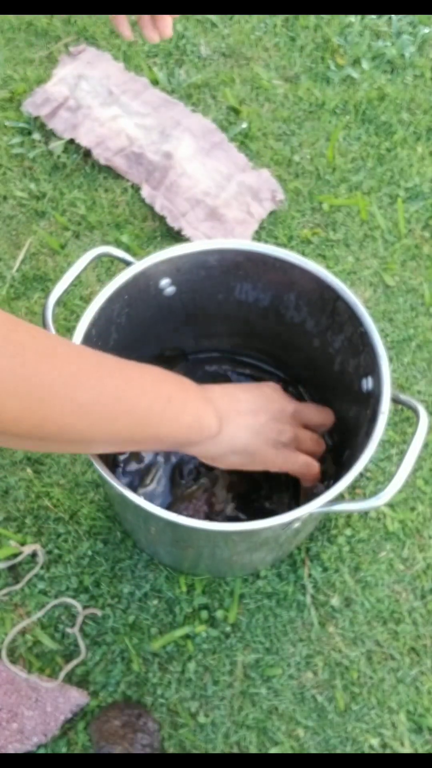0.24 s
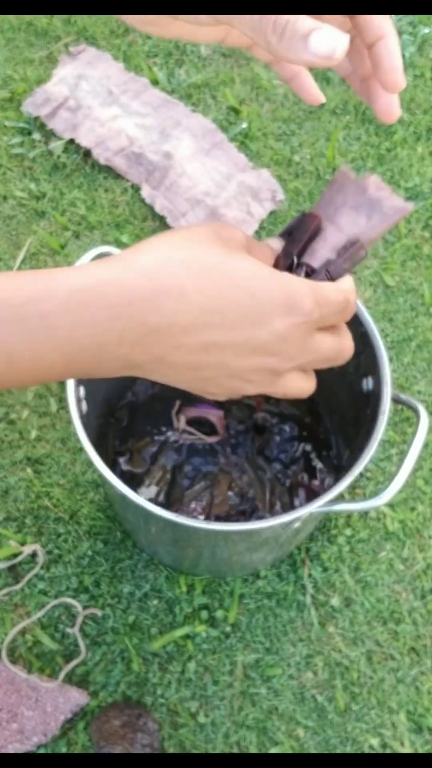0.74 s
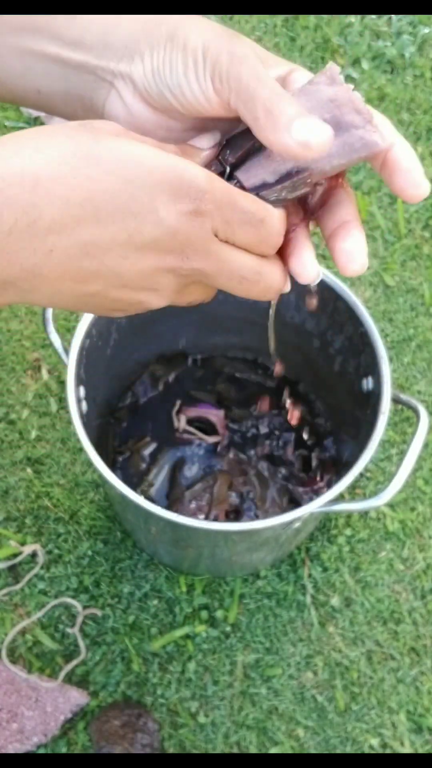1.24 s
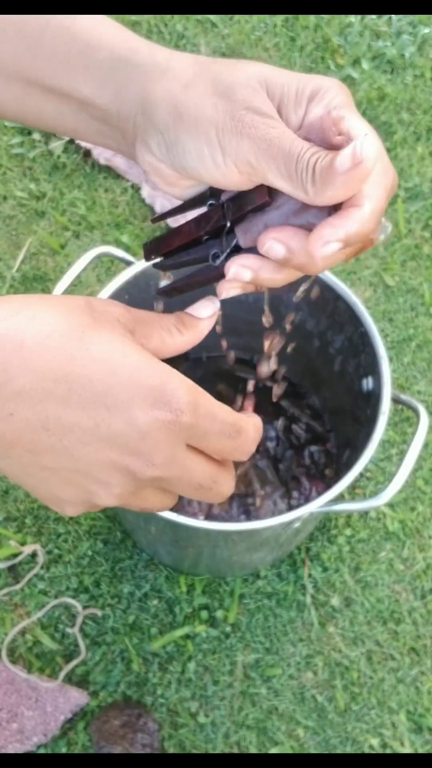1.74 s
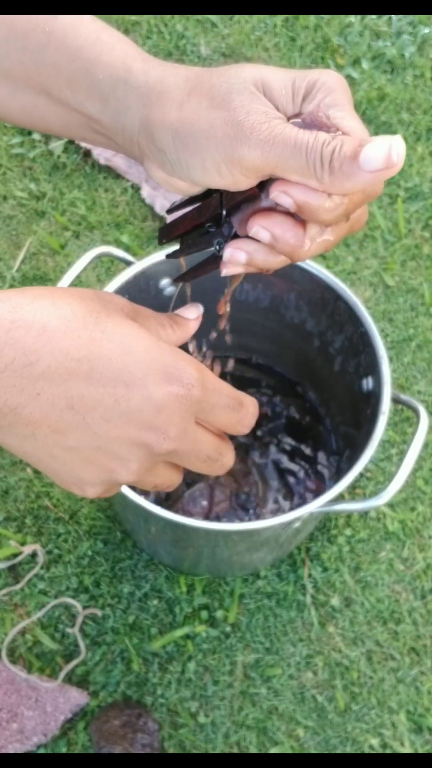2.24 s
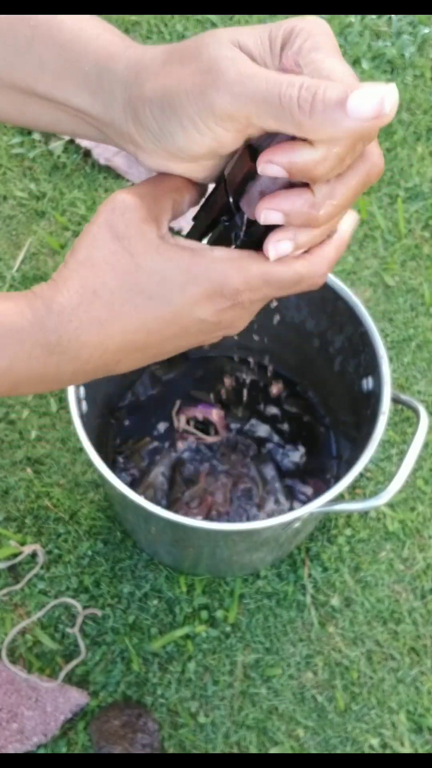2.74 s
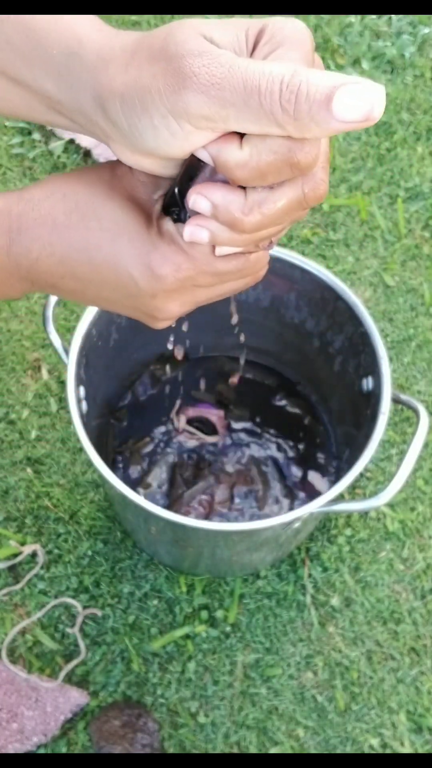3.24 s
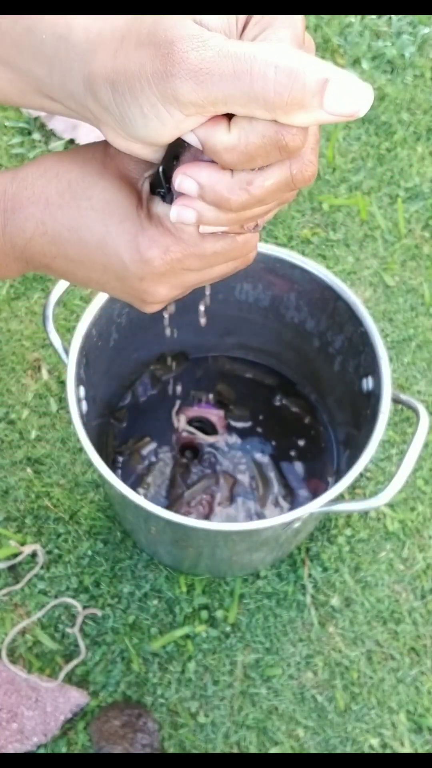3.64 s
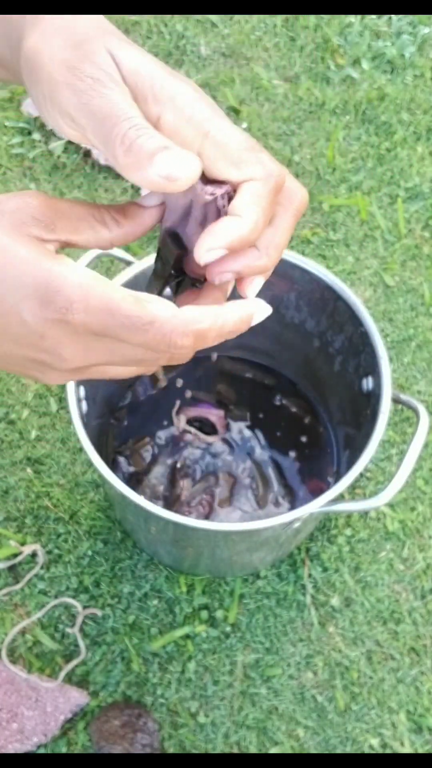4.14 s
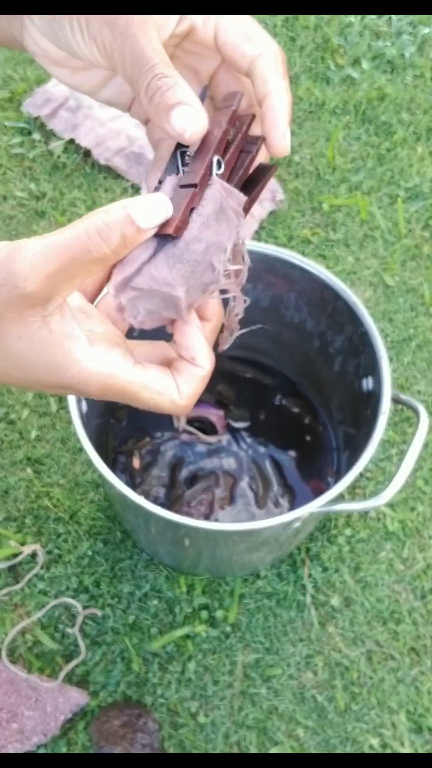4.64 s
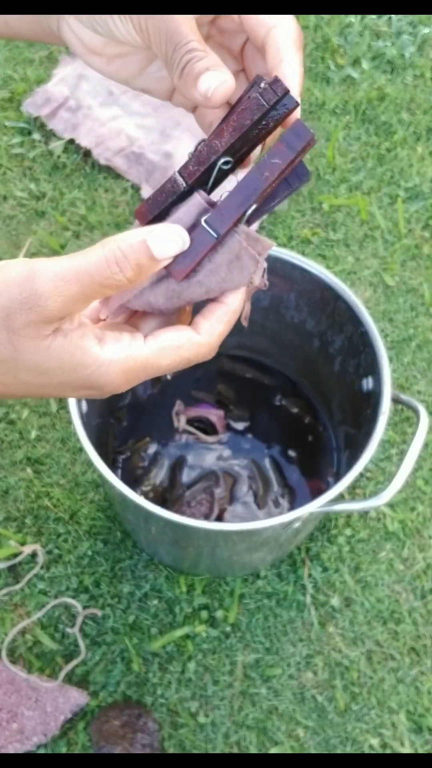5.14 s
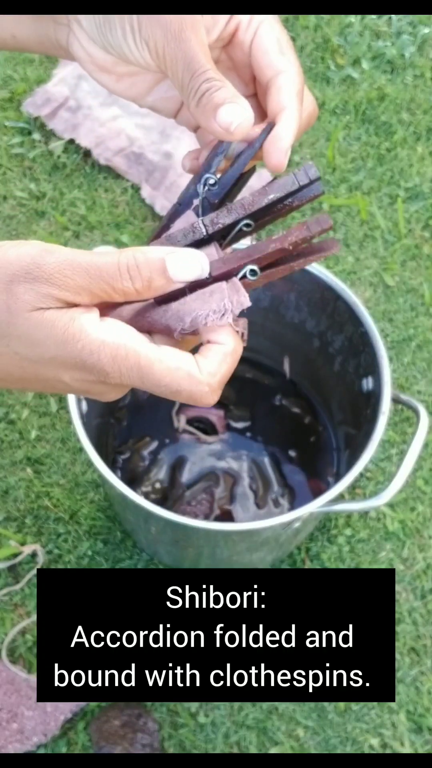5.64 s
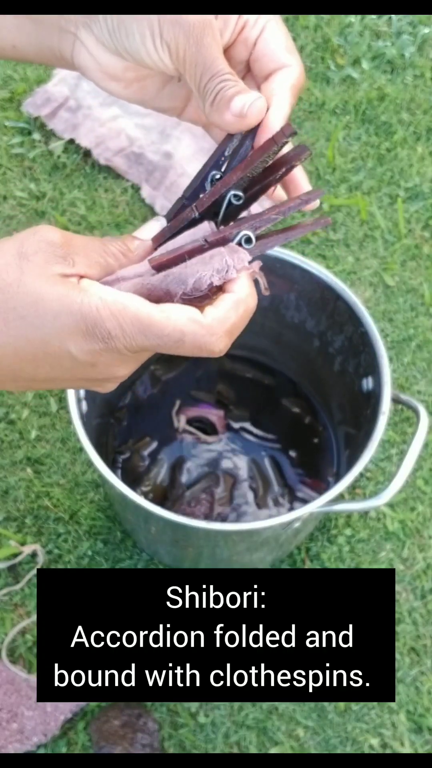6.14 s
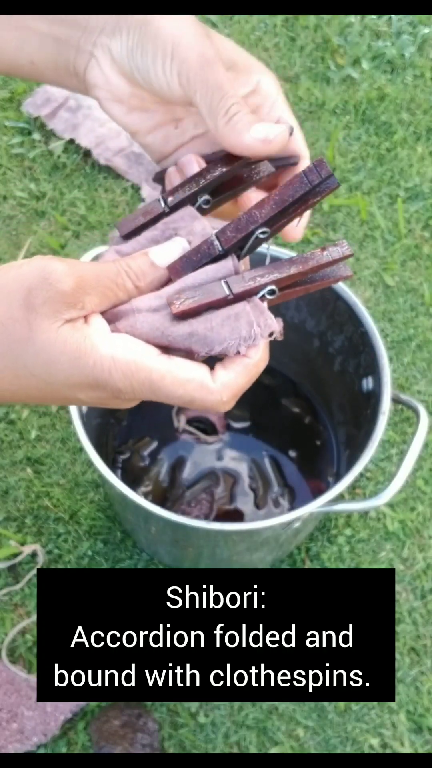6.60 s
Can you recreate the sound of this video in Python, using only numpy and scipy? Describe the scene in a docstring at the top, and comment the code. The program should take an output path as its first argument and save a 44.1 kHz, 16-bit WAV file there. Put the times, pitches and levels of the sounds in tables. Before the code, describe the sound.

A close stereo pickup outdoors beside a steel pot of liquid. From 0.1 to 0.5 s there are small plops and low bubbly blips as a hand moves in the dye. From 0.6 s the wet bundle comes out, and at 0.8 to 1.3 s bright drops slap and plink rapidly, with fine spray. After a brief thinning, from 1.5 to 2.8 s the wringing sends down the densest stream: crisp, high splashes, rising bubble chirps and quick gulps, strongest near 1.9 s, coloured by a short, slightly metallic pot echo. A lull follows, then sparse ticking drips from 3.2 to 4.2 s, isolated ones near 4.4, 4.65 and 4.9 s, and a last faint tick near 5.9 s. Throughout, low traffic rumble, a distant engine hum around 100 Hz that wavers, and a very thin high insect whine; faint husky bird whistles are clearest around 1.6, 3.4 to 3.9 and 5.9 to 6.3 s.

```python
"""Dye runs off a wrung cloth bundle into a steel pot on a lawn, close to a two-port stereo microphone.
Drops are noise slaps, bubbles are dying tones whose pitch climbs, gulps are fast upward sweeps.
Spray is a patter of blips over hiss; the drops excite resonances, and a short treble echo colours all.
Behind it: traffic rumble (shaped noise), a far engine drone (five harmonics), a thin insect whine
(narrow noise) and a distant bird (husky gliding whistles with echoes)."""
import sys
import numpy as np
from scipy import signal
from scipy.fft import rfft, irfft
from scipy.io import wavfile
from scipy.ndimage import uniform_filter1d

SR = 44100
rng = np.random.default_rng(int(sys.argv[2]) if len(sys.argv) > 2 else 0)


def unload_audio(sound):
    """Save the sound as a 16-bit wav file, at the path given as the first command line argument."""
    columns = np.transpose(np.atleast_2d(sound))
    # keep every value between -1 and 1, then stretch to whole-number steps
    steps = np.round(np.clip(columns, -1, 1) * 32767)
    wavfile.write(sys.argv[1], SR, steps.astype(np.int16))


N = 302834  # length in samples


def gain_of(db):
    """Decibels to amplitude."""
    return 10 ** (np.asarray(db) / 20)


def evened(x):
    """Scales to rms 1."""
    return x / np.sqrt(np.mean(x ** 2) + 1e-20)


def read(points, hz):
    """Reads a spectrum on a log-frequency axis."""
    f, value = np.transpose(points)
    return np.interp(np.log(hz + 1), np.log(f + 1), value)


def follow(points, seconds):
    """Reads a (time, value) table with straight lines between its points."""
    return np.interp(seconds, *np.transpose(points))


def sine(pitch_hz):
    """A sine that follows a pitch curve."""
    return np.sin(2 * np.pi * np.cumsum(pitch_hz) / SR)


def add(mix, s, sound, pan_db, lag_s=0.):
    """Places a one- or two-channel sound in the mix, the left lag_s later; pan_db mainly softens the right."""
    for side, sign, start in ((0, 0.03, s + lag_s), (1, -2, s)):
        part = mix[side, round(start * SR):][:sound.shape[-1]]
        part += np.atleast_2d(sound)[-side, :len(part)] * gain_of(sign * pan_db / 2)


def band(x, lo_hz, hi_hz):
    """Band-pass filter."""
    sos = signal.butter(2, [lo_hz, min(hi_hz, SR / 2.1)], "band", fs=SR, output="sos")
    return signal.sosfilt(sos, x)


def resonate(x, hz, width_hz):
    """Shifts the curve hz down to zero, smooths, and shifts back."""
    turn = np.exp(2j * np.pi * np.cumsum(hz * np.ones(len(x))) / SR)
    r = np.exp(-np.pi * width_hz / SR)
    return 2 * (turn * signal.lfilter([1 - r], [1, -r], x / turn)).real


def tail(t60, seconds):
    """Two unrelated dying noise tails of energy 1."""
    t = np.arange(round(seconds * SR)) / SR
    x = rng.standard_normal((2, len(t))) * gain_of(-60 * t / t60)
    return x / np.linalg.norm(x, axis=1)[:, None]


# Outdoor air, spectrum before the overall level is set: f/Hz, relative level per Hz/dB
AIR_SPECTRUM = [(25, -27.5), (50, -1), (85, 4.5), (140, 2), (230, -13.5), (400, -24), (750, -31.5),
                (1050, -29.5), (1400, -39), (2500, -43.5), (5000, -55), (8600, -61), (11500, -44.5),
                (15500, -40)]
# Likeness of the two ports once the lag is taken out: f/Hz, likeness (0 to 1)
PORT_LIKENESS = [(30, 0.93), (180, 0.83), (550, 0.41), (1400, 0.35), (4000, 0.091), (15000, 0.056)]
# Lean of the air toward the left port: f/Hz, left minus right level/dB
PORT_LEAN = [(30, 2.5), (60, -2.5), (180, 0.5), (550, 2.5), (1650, 0), (4970, 2), (15000, 6.5)]
# Swell of the traffic's bass: t/s, level/dB
RUMBLE_SWELL = [(0, -1), (.6, -1.5), (1.198, -1), (2.6, 0), (3.299, 1), (4.199, 1), (4.701, 0), (5.5, 1.5),
                (6.202, -1), (6.6, 3.5), (6.87, -0.5)]
# Swell of the tyre band around 950 Hz: t/s, level/dB
TYRE_SWELL = [(0, 1), (1.8, 1), (2.099, 6), (2.7, 2), (3.1, -2.5), (3.5, 3), (4, -2), (5.6, 2), (6.1, 1.5),
              (6.87, 1.5)]
STREET_LAG_S = 0.00041  # the left port hears the treble this much later


def background():
    """Street and air: patchy shaped noise whose bass and tyre band swell with the traffic."""
    frames, hz = N // 512 + 5, np.fft.rfftfreq(2048, 1 / SR)
    a, b, c, d, patches = rng.standard_normal((frames, 1025, 5)).T
    patches = uniform_filter1d(patches, size=20, axis=0)
    patches = evened(uniform_filter1d(patches, size=8, axis=1))
    now = np.arange(frames) * 512 / SR
    bass = 1 / (1 + (hz[:, None] / 250) ** 4)
    tyre_band = 1 / (1 + (np.log2(hz[:, None] / 950 + 0.0015) / 0.86) ** 4)
    swell_db = bass * follow(RUMBLE_SWELL, now) + tyre_band * follow(TYRE_SWELL, now)

    same = np.clip(read(PORT_LIKENESS, hz), -1, 1)[:, None]
    left, stranger = a + 1j * b, c + 1j * d
    # the bass arrives from all round, so its lag vanishes
    lag_s = STREET_LAG_S * hz ** 2 / (hz ** 2 + 900 ** 2)
    lag = np.exp(-2j * np.pi * hz * lag_s)[:, None]
    z = np.array([left * lag, same * left + np.sqrt(1 - same ** 2) * stranger])
    lean_db = read(PORT_LEAN, hz)[:, None] / 2 * np.array([1, -1])[:, None, None]
    z *= gain_of(read(AIR_SPECTRUM, hz)[:, None] + lean_db + 1.27 * patches + swell_db)
    noise = signal.istft(z, nperseg=2048, noverlap=1536)[1][:, :N]
    return gain_of(-46.5) * evened(noise)


# Far engine: t/s, firing rate f/Hz, reference level/dB, lift of the upper multiples/dB
ENGINE = [(0.0, 99.3, -55, -2.5), (0.94, 98.64, -53, 0.5), (1.74, 98.4, -48, -1.5), (2.298, 97.71, -53, 2),
          (3.8, 97.5, -50.5, -11), (4.219, 97.3, -53.5, -2), (4.499, 97.25, -73.5, 9),
          (4.8, 97.37, -55.5, 5.5), (5.451, 97.36, -50.5, 6.5), (6.1, 97.2, -59.5, 11),
          (6.45, 96.8, -50, -2), (6.87, 96.55, -56.5, 1)]
# Its harmonics: multiple of the firing rate, level against the reference/dB, share of the lift
ENGINE_MULTIPLES = [(1, -1, 0), (2, -1, 0), (3, -18, 0.8), (4, -25.5, 0.97), (5, -31.5, 1)]
WAVER_DB, WAVER_HZ = 1.5, 2.5  # rms waver of the first multiple; upper limit of its rate


def drone():
    """Far engine: steady firing heard as five harmonics that fade in and out with the air."""
    s, *controls = np.transpose(ENGINE)
    t = np.arange(N) / SR
    hz, level_db, lift_db = (np.interp(t, s, c) for c in controls)
    turns, out = np.cumsum(hz) / SR, np.zeros(N)
    for k, db, share in ENGINE_MULTIPLES:
        # each multiple wavers by itself, the higher ones more
        waver = evened(sum(np.sin(2 * np.pi * (WAVER_HZ * a * t + b)) for a, b in rng.random((5, 2))))
        level = gain_of(level_db + db + share * lift_db + WAVER_DB * np.sqrt(k) * waver)
        out += np.sqrt(2) * level * np.sin(2 * np.pi * (round(k) * turns + rng.random()))
    return out


WHINE_HZ, WHINE_WIDTH_HZ, WHINE_DB = 14900, 160, -80  # centre; width of each filter pass; level before the lean


def whine():
    """Insect: noise narrowed by two resonances, stronger at the left port."""
    hiss = []
    for x in rng.standard_normal((2, N)):
        once = resonate(x, WHINE_HZ, WHINE_WIDTH_HZ)
        hiss.append(resonate(once, WHINE_HZ, WHINE_WIDTH_HZ))
    return gain_of(WHINE_DB) * evened(np.array(hiss)) * gain_of([[3], [-3]])


# Distant bird notes: t/s, length/s, nominal level/dB, first f/Hz, last f/Hz, width of each husk filter/Hz
BIRD_NOTES = [(0.553, 0.081, -62.5, 2750, 2750, 300), (1.588, 0.22, -59, 2575, 3090, 350),
              (1.85, 0.067, -60, 2870, 2720, 200), (3.298, 0.078, -74.5, 2070, 2650, 99),
              (3.428, 0.083, -59, 2950, 2740, 407), (3.507, 0.17, -78, 2880, 2860, 200),
              (3.618, 0.094, -62, 2010, 2170, 352), (3.752, 0.028, -73, 2000, 1980, 250),
              (3.803, 0.051, -63, 2184, 1810, 150), (3.854, 0.026, -65, 1800, 1820, 250),
              (4.67, .45, -75, 1573, 1570, 497), (4.73, 0.41, -68, 2590, 2560, 804),
              (5.574, 0.21, -76, 2016, 2150, 700), (5.756, 0.18, -73.5, 1590, 1600, 182),
              (5.879, 0.078, -61, 2860, 2780, 345), (5.881, 0.15, -78, 2340, 2500, 254),
              (5.976, 0.12, -77.5, 2840, 2750, 200), (6.07, 0.073, -58.5, 2013, 2160, 300),
              (6.121, 0.052, -66.5, 2220, 2500, 251), (6.154, 0.11, -74.5, 2070, 1960, 201.5),
              (6.246, 0.12, -63, 1970, 1978, 379), (6.535, 0.13, -71, 2434, 2290, 256),
              (6.779, 0.051, -72, 2270, 2260, 200), (6.82, 0.063, -67, 1950, 1980, 407)]


def bird():
    """Distant bird: gliding whistles mixed with narrow noise, blurred by echoes off trees and walls."""
    song = np.zeros((2, N))
    for s, length, level_db, first_hz, last_hz, husk_hz in BIRD_NOTES:
        pitch = np.linspace(first_hz, last_hz, round(length * SR))
        clear = np.sqrt(2) * sine(pitch)
        husky = rng.standard_normal(SR // 2)[:len(pitch)]
        for _ in range(3):
            husky = resonate(husky, pitch, husk_hz)
        note = (0.94 * clear + 2.13 * evened(husky)) * signal.windows.tukey(len(pitch), .7)
        add(song, s, gain_of(level_db) * note, 5, .00018)
    return 0.6 * song + 0.35 * signal.oaconvolve(song, tail(0.24, 0.3), axes=1)[:, :N]


# Fine spray between the drops: t/s, reference level/dB, brightness before its drift/dB per octave
SPRAY_COURSE = [(0.0, -80.5, -5), (0.48, -77, -12.5), (0.6, -68, 1), (0.9, -83.5, -8), (1.0, -56, -9),
                (1.13, -70.5, -6), (1.26, -79.5, -6), (1.469, -73, -3), (1.66, -68, -8), (2.36, -68, 1.5),
                (2.66, -66.5, -5.5), (2.9, -79, 6.5), (3.48, -91, 7), (3.74, -89, 13), (3.79, -73, -8),
                (3.89, -68, -4), (4.27, -87.5, 6), (5.201, -92, -13), (5.531, -98.5, -7.5), (6.87, -102, 1)]
# Colour of the spray: f/Hz, relative level/dB
SPRAY_TINT = [(1800, -14.5), (2600, -16.5), (4000, -10), (5500, -6.5), (7200, 1.5), (8800, -12.5),
              (11500, -5), (15500, -1)]
# rms swings: the hiss flickers, droplets come in clumps, their brightness (dB per octave) wanders
FLICKER_DB, CLUMP_DB, DRIFT_DB = 4.5, 5, 3


def spray():
    """Droplets too small to count: short rising blips of unequal size over the hiss of wet cloth."""
    s, level_db, bright_db = np.transpose(SPRAY_COURSE)
    now, t = np.arange(N) / SR, np.arange(400) / SR
    level_db, bright_db = np.interp(now, s, level_db), np.interp(now, s, bright_db)
    slow = (uniform_filter1d(uniform_filter1d(x, size=900), size=900) for x in rng.standard_normal((2, N)))
    flicker, drift = (evened(x) for x in slow)
    bright_db = bright_db + DRIFT_DB * drift

    patter = np.zeros((2, N))
    for hz in np.geomspace(1800, 15500, num=26):
        fade = gain_of(-60 * t * hz / 49.0)  # 60 dB in 49 cycles of the starting pitch
        blip = np.sin(2 * np.pi * hz * t * (1 + 60 * t)) * fade * hz / 6000
        draw, side, big = rng.random((3, N))
        at = np.flatnonzero(draw < 65. / SR * gain_of(CLUMP_DB * flicker))
        unequal_db = 16.0 - 3.47 * np.log(big[at] + 0.0033)
        colour_db = bright_db[at] * np.log2(hz / 6000) + read(SPRAY_TINT, hz)
        size = np.zeros(N)
        size[at] = gain_of(unequal_db + level_db[at] + colour_db)
        ports = size * np.array([side, 0.72 * (1 - side)])
        patter += signal.oaconvolve(ports, blip[None], axes=1)[:, :N]

    tint = list(SPRAY_TINT) + [(17000, -8.5)]
    colour = gain_of(read(tint, np.fft.rfftfreq(N, 1 / SR)))
    hiss = evened(irfft(rfft(rng.standard_normal((2, N))) * colour, N))
    wet = np.clip((level_db + 71) / 15, 0, 1)  # flickers only while dye runs
    # the hiss swells less than the patter
    return patter + gain_of(0.63 * level_db - 23.5 + FLICKER_DB * wet * flicker) * hiss


# rate at each pitch; level above the spray before unequal sizes; cycles of the starting pitch to fall 60 dB
PLINKS_PER_S, PLINK_DB, PLINK_CYCLES = 7.5, 7.5, 18


def plinks():
    """Small bubbles in their dozens: brief rising tones, louder wherever the spray is thick."""
    s, level_db, _ = np.transpose(SPRAY_COURSE)
    level_db = np.interp(np.arange(N) / SR, s, level_db)
    out, t = np.zeros((2, N)), np.arange(1500) / SR
    for hz in np.geomspace(1700, 6500, num=14):
        envelope = gain_of(-60 * t * hz / PLINK_CYCLES) * np.minimum(t / 0.00075, 1)
        plink = np.sin(2 * np.pi * hz * t * (1 + 3 * t)) * envelope
        draw, side, big = rng.random((3, N))
        size = (draw < PLINKS_PER_S / SR) * gain_of(PLINK_DB + level_db - 2.4 * np.log(big + 0.027))
        ports = size * np.array([side, 0.81 * (1 - side)])
        out += signal.oaconvolve(ports, plink[None], axes=1)[:, :N]
    return out


# Cavities that close fast behind a heavy drop: t/s, peak level before pan/dB, first f/Hz, last f/Hz, length/s
CAVITIES = [(0.808, -47, 4300, 5640, 0.0091), (2.011, -38, 2130, 5240, .009),
            (2.187, -29, 3060, 5700, 0.01), (2.288, -48, 2950, 6300, 0.0046)]


def gulps():
    """Closing cavities: a brief tone that shoots upward as the cavity shrinks."""
    out = np.zeros((2, N))
    for s, peak_db, first_hz, last_hz, length in CAVITIES:
        pitch = np.geomspace(first_hz, last_hz, round(length * SR))
        add(out, s, gain_of(peak_db) * signal.windows.tukey(len(pitch), .4) * sine(pitch), 1.5)
    return out


# Trapped bubbles, and thin, nearly steady pot rings near 1950 Hz:
# t/s, nominal level/dB, centre f/Hz, cycles that set the fade (at least 4 are used)
BUBBLES_AND_RINGS = [(0.164, -46, 1035, 9.7), (0.172, -55.5, 923, 30), (0.172, -46, 370, 5.3),
                     (0.176, -50, 1550, 13), (0.177, -49, 1990, 16), (0.2552, -52, 3230, 22),
                     (0.337, -37, 2190, 10.4), (0.367, -52, 1890, 35), (0.381, -50, 2410, 19),
                     (0.434, -42.5, 1860, 3.6), (0.6188, -38, 4250, 9.9), (0.6668, -52, 3355, 39),
                     (0.702, -42, 1044, 22), (0.711, -40, 4900, 5.7), (0.711, -37, 8160, 5.6),
                     (0.724, -43.5, 3300, 8), (0.74, -45.5, 1340, 2.6), (0.74, -28.5, 7000, 1.5),
                     (0.749, -43.5, 1690, 15), (0.768, -43.5, 1930, 6.5), (0.807, -41, 7000, 13),
                     (0.92, -35.5, 7500, 5.1), (0.932, -38.5, 2580, 4.2), (0.932, -45, 1920, 3.4),
                     (0.975, -38, 3600, 7.7), (0.971, -42, 5700, 7.4), (0.976, -47.5, 1470, 5.1),
                     (0.9945, -35, 7350, 8.7), (0.994, -51, 1990, 37), (1.048, -30.5, 8000, 16),
                     (1.0795, -23, 7250, 8.8), (1.114, -51.5, 1613, 28), (1.1372, -34, 4160, 17),
                     (1.158, -51.5, 1940, 19), (1.156, -36, 7650, 14), (1.175, -26, 7330, 13),
                     (1.138, -31, 5500, 14), (1.157, -29, 5160, 9.4), (1.2119, -42, 8900, 11),
                     (1.2535, -27.5, 7210, 22), (1.4268, -35.5, 4290, 11), (1.4724, -39.5, 6730, 11),
                     (1.512, -41.5, 3670, 13), (1.5489, -22, 5360, 7.1), (1.5542, -53, 1990, 19),
                     (1.6574, -52, 3370, 25), (1.7054, -34, 3150, 10.7), (1.7055, -24.5, 10100, 15),
                     (1.7298, -34, 7750, 11), (1.7407, -33, 7260, 11), (1.76, -48, 7600, 19),
                     (1.855, -13.5, 6910, 15.5), (1.9168, -41.5, 4700, 22), (1.9732, -45, 7300, 19),
                     (2.0145, -25.5, 3600, 2), (2.113, -34.5, 8400, 11), (2.126, -37, 7800, 10),
                     (2.13, -26.5, 7400, 8.4), (2.188, -42, 3600, 26), (2.2383, -49.5, 1953, 27),
                     (2.271, -30, 7150, 6.1), (2.2842, -56.5, 1954, 32), (2.31, -32.5, 6700, 6.8),
                     (2.3492, -26, 6630, 9), (2.3961, -22.5, 5120, 14), (2.4606, -50.5, 2350, 14),
                     (2.4631, -59.5, 1976, 82), (2.4683, -37.5, 5270, 12), (2.501, -38, 2990, 11),
                     (2.501, -35, 5300, 11), (2.529, -49.5, 1985, 35), (2.5524, -31, 6600, 9.3),
                     (2.569, -37.5, 5000, 10), (2.598, -37, 8100, 20), (2.598, -35, 5070, 8.4),
                     (2.6, -47, 2770, 12), (2.607, -54, 2480, 9.3), (2.644, -49, 3100, 6),
                     (2.619, -50, 2940, 22), (2.753, -25, 7730, 17), (3.3963, -44.5, 5340, 13),
                     (3.7993, -37, 8900, 4.1), (3.864, -55.5, 2910, 19), (4.4126, -47.5, 7240, 17),
                     (4.6486, -48.5, 7140, 14), (4.631, -58, 6800, 15), (4.908, -44, 7200, 60),
                     (4.909, -52, 2680, 24)]
# climb per fade time at 5 kHz and ten cycles; small, short bubbles climb most
CLIMB, CLIMB_PITCH_POWER, CLIMB_CYCLES_POWER = 0.06, 0.7, -0.6
# pan at 4 kHz, its random spread, and its tilt
BUBBLE_PAN_DB, BUBBLE_PAN_SPREAD_DB, BUBBLE_PAN_DB_PER_OCTAVE = 3.5, 3, 0.24


def bubbles_and_rings():
    """Dying tones: bubbles climb as they near the surface, their wobbling walls rough; pot rings barely climb."""
    out, t = np.zeros((2, N)), np.arange(5000) / SR
    noises = rng.standard_normal((len(BUBBLES_AND_RINGS), len(t)))
    for (s, peak_db, hz, cycles), noise in zip(BUBBLES_AND_RINGS, noises):
        age = t * hz / max(cycles, 4)  # in fade times
        climb = CLIMB * (hz / 5000) ** CLIMB_PITCH_POWER * (cycles / 10) ** CLIMB_CYCLES_POWER
        pitch = hz * (1 + climb * (np.minimum(age, 1.2) - .7))
        swell = (1 - np.exp(-age / 0.041)) / (1 + (age / 3.8) ** 5) * np.exp(-.9 * age)
        wobble = 1 + 0.53 / (1 + hz / 5000) * np.tanh(evened(band(noise, hz / 20, hz / 6)))
        wobble = wobble * np.linalg.norm(swell) / np.linalg.norm(swell * wobble)  # keeps the energy
        pan_db = BUBBLE_PAN_DB + BUBBLE_PAN_SPREAD_DB * noise[1] + BUBBLE_PAN_DB_PER_OCTAVE * np.log2(hz / 4000)
        add(out, s, gain_of(peak_db) * swell * wobble * sine(pitch), pan_db, .00004 * noise[0])
    return out


# Drops striking the surface: t/s, peak level of the top before pan/dB, middle range against the top/dB
DROP_SLAPS = [(0.1467, -38, -20), (0.1619, -33.5, -7), (0.3375, -57.5, 17.5), (0.36, -47, 8),
              (0.3794, -51, 4.5), (0.435, -50.5, 4.5), (0.617, -42, 6), (0.6909, -41, -4),
              (0.703, -37.5, 2.5), (0.807, -38, -3), (0.817, -23, -23), (0.917, -44, -2),
              (0.9259, -22.5, -11), (0.933, -40, -1), (0.9638, -46, -1), (0.9724, -36, 0),
              (0.9917, -23.5, -12), (1.007, -24.5, -4), (1.0158, -25, -4), (1.0473, -26.5, -3.5),
              (1.079, -25, -9), (1.1135, -43, 0), (1.1375, -24, -7), (1.157, -28, -1), (1.174, -35, -6),
              (1.252, -36, -4), (1.261, -36, 1), (1.4254, -53, 8), (1.442, -59, 12), (1.4714, -55.5, 13),
              (1.507, -40, -1), (1.5463, -26, -6.5), (1.55, -30, -19), (1.5906, -37.5, -25),
              (1.621, -32.5, -11), (1.66, -34.5, -11), (1.691, -25.5, -15), (1.705, -22, -16.5),
              (1.738, -26, -7.5), (1.76, -33, -3), (1.8078, -27.5, -14), (1.8227, -40.5, 4.5),
              (1.831, -38, -7.5), (1.8566, -15.5, -9), (1.8827, -40, -1.5), (1.9118, -39.5, -0.5),
              (1.947, -33, -9), (1.9959, -38, -27), (2.0099, -23.5, -8.5), (2.0367, -19, -20.5),
              (2.051, -32, -4.5), (2.1115, -44, -18), (2.1313, -21, -34.5), (2.1444, -29, -12),
              (2.157, -35, -5), (2.1861, -23, -3), (2.2172, -22, -21), (2.241, -17, -23),
              (2.264, -28.5, -3.5), (2.282, -32.5, 1), (2.312, -32, -10), (2.327, -29, -12),
              (2.3474, -29, -3), (2.396, -31.5, 2.5), (2.435, -26.5, -7), (2.444, -45, -16),
              (2.453, -40, -28), (2.5017, -28, -2.5), (2.5533, -34, 0), (2.5723, -19, -15),
              (2.598, -36, 0.5), (2.623, -34, -9), (2.656, -57, -13), (2.685, -34, -26),
              (2.727, -37.5, -11), (2.753, -21.5, -11.5), (2.7774, -18, -23), (2.806, -40, -9),
              (3.247, -40, -17), (3.265, -28.5, -48), (3.4316, -37.5, -11.5), (3.5079, -49.5, -2),
              (3.6097, -41, -23), (3.68, -28.5, -25), (3.736, -40, -29), (3.8, -35, -16), (3.819, -40, -12),
              (3.854, -39, -17), (3.909, -48.5, 0), (3.9493, -42, -14), (3.9706, -47, -16),
              (4.047, -40, -29), (4.1824, -42, -19), (4.412, -35.5, -29), (4.6504, -39, -18.5),
              (4.91, -57.5, 15.5), (4.99, -44.5, -1.5), (5.871, -41, -31)]
TOP_LOW_HZ, TOP_HIGH_HZ = 10500, 15600  # the nominal centre of each slap's top falls between these
SPATTER_DB = 8  # rms unevenness of the after-splash


def slaps():
    """A crack about a millisecond long with its own colour, then a fizz that differs at the two ports."""
    out, t = np.zeros((2, N)), np.arange(1600) / SR
    crack = (1 - np.exp(-t / 0.00023)) * gain_of(-60 * t / 0.0044)
    # top, then middle: the top fades first
    fizz_db = np.array([[[-25]], [[-20]]]) - 60 * t / np.array([[[0.03]], [[0.045]]])
    fizz = (1 - np.exp(-t / 0.0053)) * gain_of(fizz_db)
    noises = rng.standard_normal((len(DROP_SLAPS), 2, 3, len(t)))
    traits = rng.random((len(DROP_SLAPS), 3))
    for (s, peak_db, middle_db), noise, (size, place, tint) in zip(DROP_SLAPS, noises, traits):
        spatter = evened(uniform_filter1d(noise[:, :1, ::-1], size=60))
        top, middle = noise[:, :1] * crack + noise[:, 1:] * fizz * gain_of(SPATTER_DB * spatter)
        middle_hz = 4000 + 3500 * size
        top_hz = TOP_LOW_HZ + (TOP_HIGH_HZ - TOP_LOW_HZ) * tint
        top = band(top, top_hz / 1.117, top_hz * 1.29)
        middle = band(middle, middle_hz / 1.4, middle_hz * 1.39)
        top *= gain_of(peak_db) / abs(top).max()
        middle *= gain_of(peak_db + middle_db) / abs(middle).max()
        add(out, s, top, 4 + 5 * place, 0.00029 * (size - .5))  # the left port favours treble
        add(out, s, middle, -1 + 4 * place, 0.00023 * (size - .5))
    return out


# Resonances of the pot, with one of the microphone near 7 kHz:
# f/Hz, level before RING_DB/dB, time to fall 60 dB t/s
RESONANCES = [(1016, -15, .08), (1640, -20, .07), (1954, -16, .08), (2713, -16, .1), (3370, -12, .11),
              (3505, -7, .085), (4032, -10, .13), (4270, -7, .08), (4930, -14, .07), (5830, -9, .05),
              (6400, -8, .045), (7020, -8, .04)]
RING_DB = -35
FLUTTER_DB, FLUTTER_T60_S, FLUTTER_LOW_HZ = -3.5, .03, 2600  # wall echo, treble only; level before its filter
TURN_HZ = 1.7  # rate at which the echo's noise tails take turns
LEFT_LAG_S = -0.00007  # the pot lies a little nearer the left microphone port


def pot(drops, mist):
    """Drops excite the resonances; all of it echoes between the walls, in a colour that varies."""
    t = np.arange(9000) / SR
    ring = sum(gain_of(db - 60 * t / t60) * np.sin(2 * np.pi * hz * t) for hz, db, t60 in RESONANCES)
    x = drops + mist
    wet = x + gain_of(RING_DB) * signal.oaconvolve(drops, ring[None], axes=1)[:, :N]
    for turn in np.arange(3) / 3:  # three noise tails take turns, so the echo's colour varies
        share = np.sqrt(2 / 3) * np.cos(2 * np.pi * (TURN_HZ * np.arange(N) / SR + turn))
        flutter = gain_of(FLUTTER_DB) * band(tail(FLUTTER_T60_S, .05), FLUTTER_LOW_HZ, 15500)
        wet += signal.oaconvolve(x * share, flutter, axes=1)[:, :N]
    lag = np.exp(-2j * np.pi * np.fft.rfftfreq(N, 1 / SR) * LEFT_LAG_S)
    return np.array([irfft(rfft(wet[0]) * lag, N), wet[1]])


def scene():
    """The pot in front, the neighbourhood behind."""
    neighbourhood = background() + drone() + whine() + bird()
    drops = slaps() + bubbles_and_rings() + gulps() + plinks()
    return pot(drops, spray()) + neighbourhood


EDGE_HZ = 16000  # upper band limit of the recorder


def record(dry):
    """The microphone's bass roll-off, then the recorder's band limit."""
    cut = signal.sosfilt(signal.butter(3, 36, "high", fs=SR, output="sos"), dry)
    cut = np.pad(cut, ((0, 0), (127, 127)), "reflect", reflect_type="odd")  # room for the filter's ends
    low_pass = signal.firwin(255, EDGE_HZ, window=("kaiser", 9), fs=SR)
    return signal.oaconvolve(cut, low_pass[None], "valid", axes=1)


dry = scene()
out = record(dry)
unload_audio(out)
```